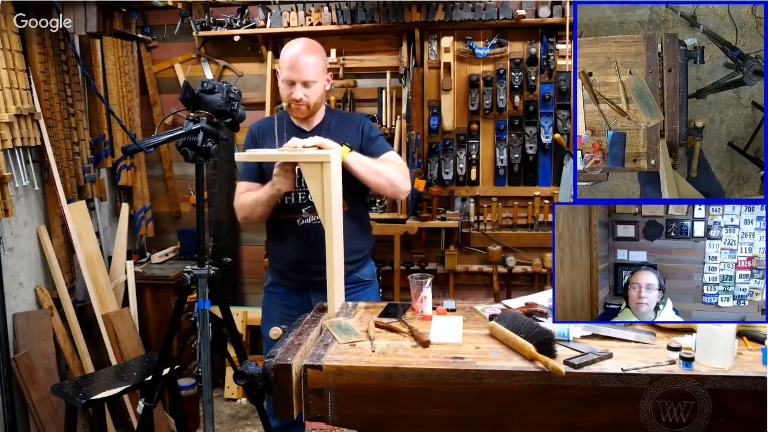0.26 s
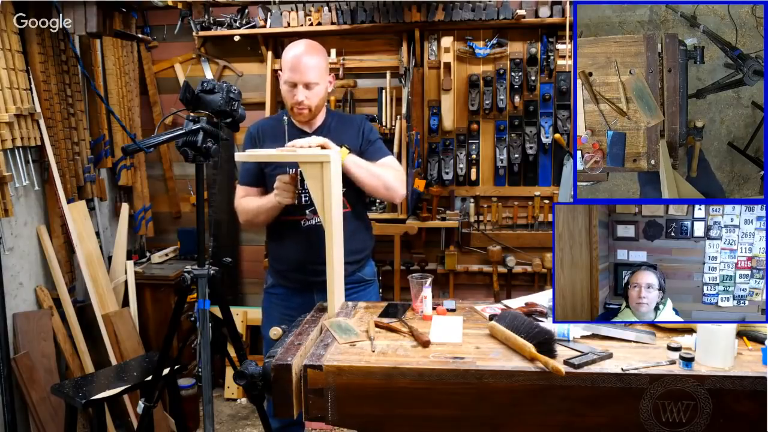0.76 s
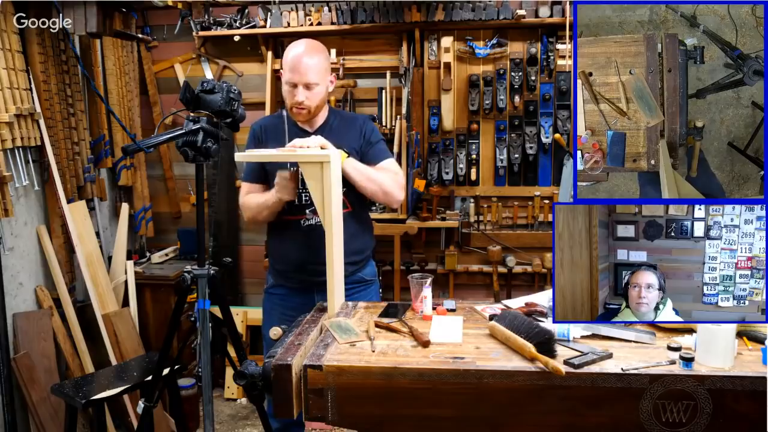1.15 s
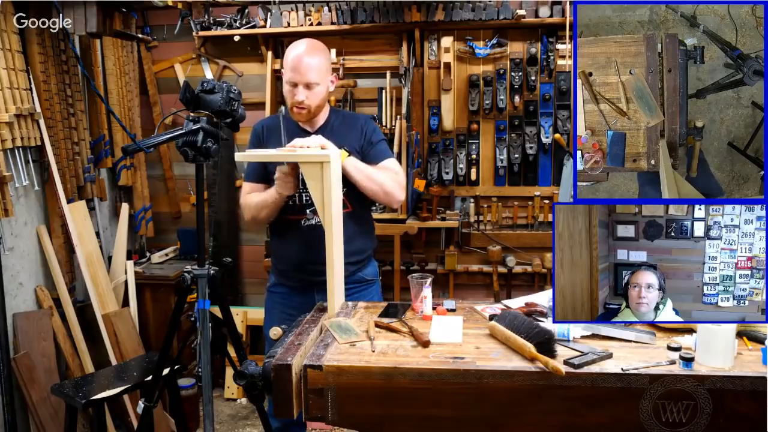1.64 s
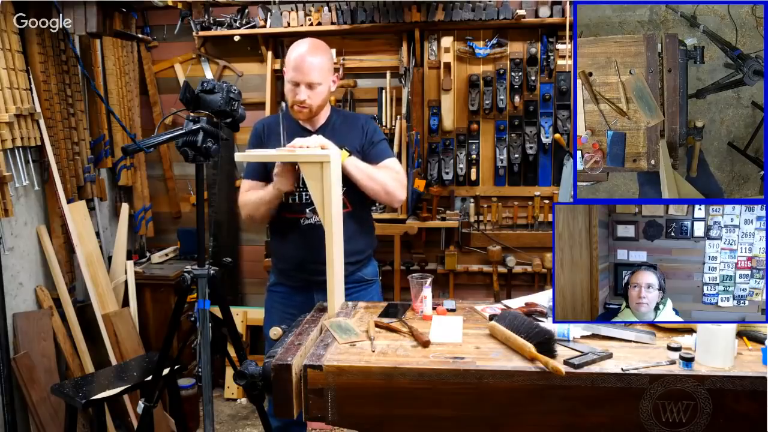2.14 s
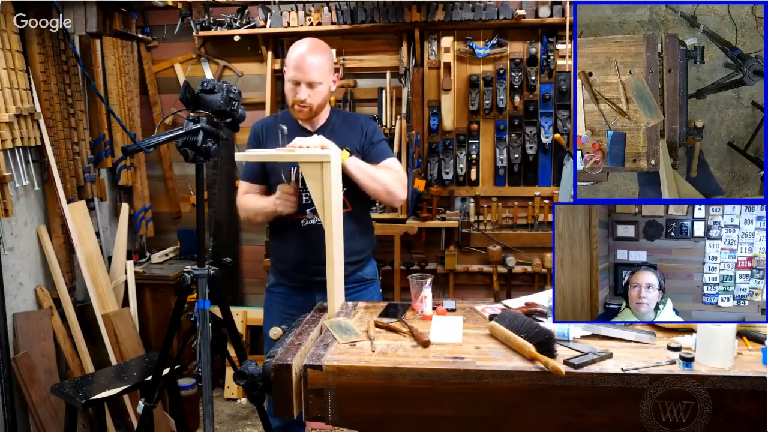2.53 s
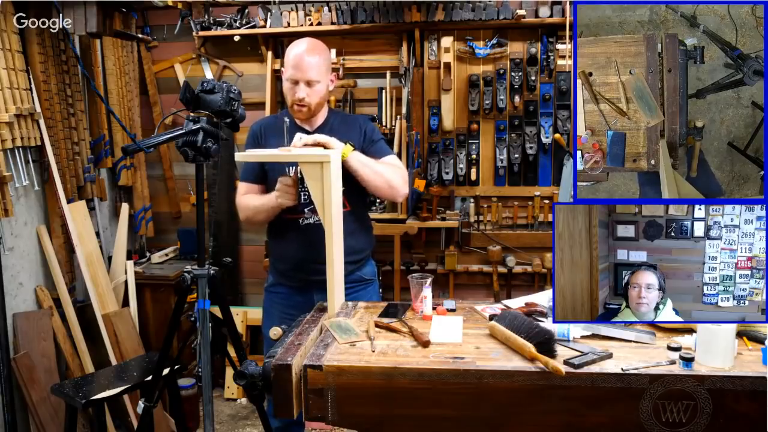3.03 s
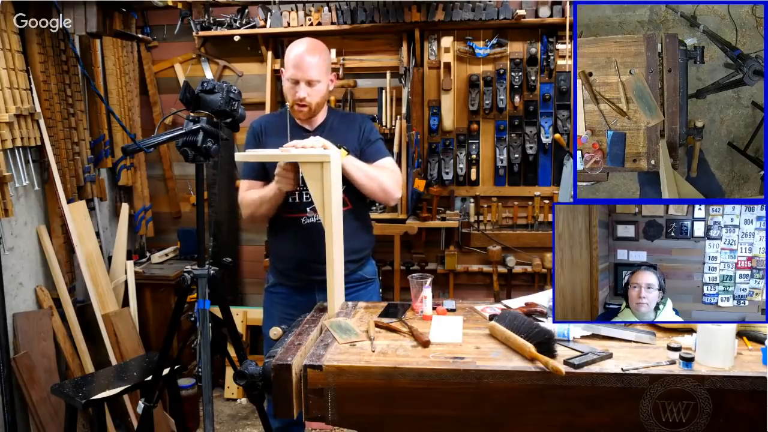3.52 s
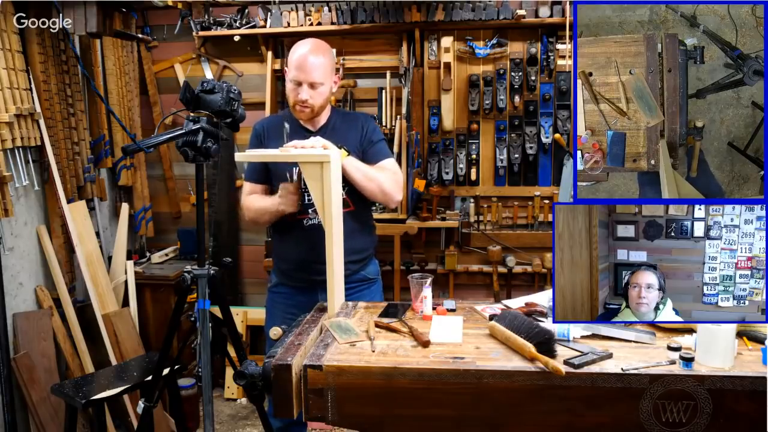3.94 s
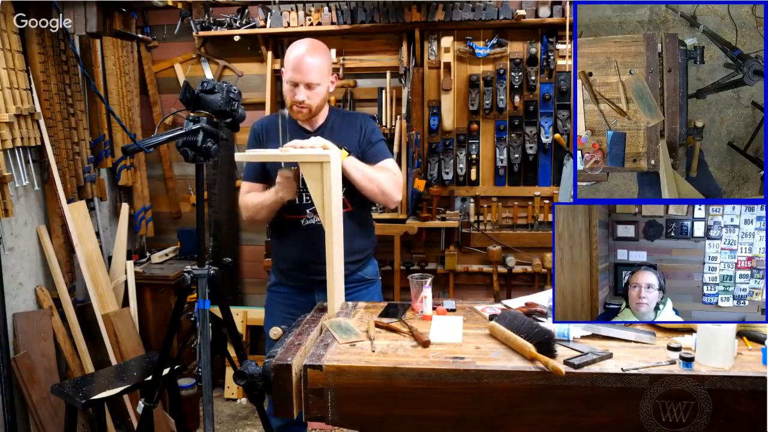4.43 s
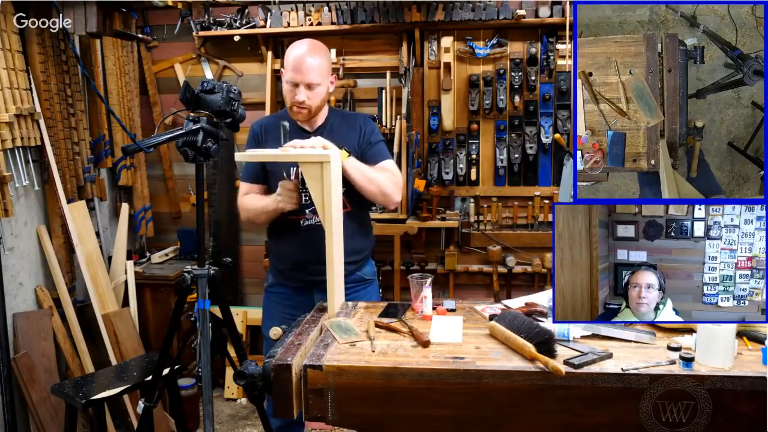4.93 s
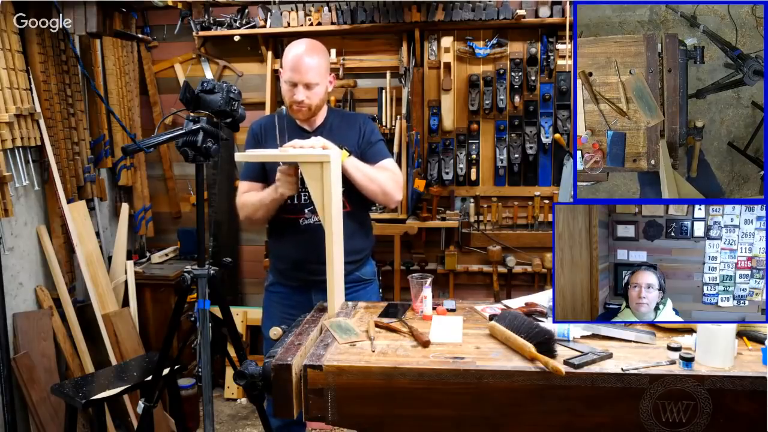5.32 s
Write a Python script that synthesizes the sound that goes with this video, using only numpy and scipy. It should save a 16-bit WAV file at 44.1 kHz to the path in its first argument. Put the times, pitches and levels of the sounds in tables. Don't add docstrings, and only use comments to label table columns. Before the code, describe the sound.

A fine-toothed hand saw works a thin clamped board, heard close in a small, cluttered workshop. Light fumbling scrapes and a hard knock come first, then brisk strokes grow louder, rough tearing alternating with an even whirr. A second hard knock ends the run around two and a half seconds; after faint touches and a near-silent gap, fast steady sawing resumes to the end.

```python
import sys
import numpy as np
from scipy import signal
from scipy.fft import rfft, irfft
from scipy.io import wavfile
from scipy.ndimage import uniform_filter1d

SR = 44100
rng = np.random.default_rng(int(sys.argv[2]) if len(sys.argv) > 2 else 0)


def master(y):
    cut = np.clip(np.atleast_2d(y).T, -1, 1)
    pcm = np.round(cut * 32767)
    wavfile.write(sys.argv[1], SR, pcm.astype(np.int16))


def volts_from_decibels(level):
    exponent = np.asarray(level, float) / 20
    return 10 ** exponent


N = 245681

# (f/Hz, width/Hz, level/dB)
STAND_MODES = [(72.4, 61, -36), (113, 33, -26.5), (171, 14, -17), (279, 47, -19), (338.6, 29, -13.5),
               (419, 27.6, -6)]
BOARD_MODES = [(550, 169, -25), (513.6, 21, -13.5), (594.7, 66, -4), (649.7, 44.7, 0.5), (721, 53.8, -0.5),
               (797, 54, -5)]
UPPER_MODES = [(1216, 57, -7.5), (1318, 51.1, -4), (1451.4, 77.6, 1), (1567, 72.5, 1), (1674, 72.5, -4),
               (1923, 115.3, -8.5), (2150, 152, -15.5), (2420, 206, -17.5), (2860, 522, -25),
               (3223, 820, -35.5)]
# (teeth engage t/s, hold/s, board level/dB, brightness/dB, stand rumble/dB)
CUTS = [(0.819, 0.087, -33.5, 9, 6), (1.116, 0.061, -29.5, 8, 6), (1.41, 0.052, -27, 7, -4),
        (1.676, 0.052, -22, 5.5, 1.5), (1.917, 0.051, -19, 3.5, -6.5), (2.163, 0.049, -19, 3.5, 1),
        (2.402, 0.047, -16, -1.5, -7), (3.08, .07, -38.5, -5, 4.5), (3.353, .05, -24, 3.5, 8),
        (3.597, 0.063, -22, 2.5, 8.5), (3.856, 0.049, -19.5, 5, 6.5), (4.097, 0.046, -18, 1.5, 10),
        (4.342, .05, -21.5, 5.5, 6), (4.588, .055, -21, 5, 0), (4.82, .045, -17.5, 2, 3.5),
        (5.060, .055, -26.5, 10, 5.5), (5.299, 0.051, -20.5, 2.5, -1), (5.54, 0.0085, -20.5, 3.5, 5.5)]
# (top speed t/s, board rings on/s, board level/dB, brightness/dB, tooth rate f/Hz)
RETURNS = [(1.0, 0.021, -28.5, -0.5, 738), (1.264, .045, -25.5, -4, 800), (1.576, 0.034, -19.5, -2.5, 740),
           (1.825, 0.031, -25.5, 5.5, 829), (2.066, 0.035, -16, -4, 824), (2.297, 0.046, -20.5, -4.5, 738),
           (2.553, 0.026, -25, 2.5, 668), (3.52, 0.011, -26.5, 0, 740), (3.751, 0.038, -32, 6.5, 760),
           (3.998, 0.037, -30, 5.5, 720), (4.238, 0.0355, -25.5, -0.5, 702), (4.49, .04, -19, -4, 730),
           (4.724, .03, -20, -1, 700), (4.955, 0.037, -25, 4.5, 628), (5.199, .045, -18.5, -5, 740),
           (5.435, .03, -18.5, -2, 716)]
FUMBLES = [(0.0, 0.083, -34.5, -11.5, 681.6), (0.063, 0.048, -29.5, -3.5, 700.5),
           (0.131, 0.0098, -31.5, -4, 608), (0.564, 0.014, -60, -20, 599.5), (0.613, 0.041, -35, -9.5, 651),
           (.68, 0.01753, -26, -14, 505.3), (2.601, 0.0135, -53, 15.5, 689.1),
           (2.684, 0.033, -33, -7.5, 693.6), (2.849, 0.1196, -94, 11, 699.6), (3.22, .01, -77, -9, 396.1)]
RETURN_HALF_S = .064


def level(x, db):
    return x * volts_from_decibels(db) / np.sqrt(np.mean(x ** 2))


def ring(x, modes):
    total = 0
    for k, (hz, width, db) in enumerate(modes):
        resonance = signal.lfilter(*signal.iirpeak(hz, hz / width, SR), x)
        total = total + (-1) ** k * volts_from_decibels(db) * resonance
    return total


def coloured(x, spectrum):
    hz, db = np.transpose(spectrum)
    bins = np.log(np.arange(N // 2 + 1) * SR / N + 1)
    return irfft(rfft(x) * volts_from_decibels(np.interp(bins, np.log(hz), db, left=-90, right=-90)), N)


def walk(rate):
    k = int(SR / rate)
    steps = np.repeat(rng.standard_normal(N // k + 1), k)
    return 1.1 * uniform_filter1d(steps, k)[:N]


def strokes():
    cut_hz, cut_even, cut_half_s = 742, .35, .073
    top_share = .62
    even_at_20_db, even_per_db = .77, .009
    fumble_even, fumble_half_s, rumble_db_per_hz = .3, .075, 0.05
    rows = []
    for s, hold, _, _, rumble_db in CUTS:
        rows.append((s + top_share * hold, cut_hz, cut_even, cut_half_s, rumble_db))
    for s, _, db, _, hz in RETURNS:
        rows.append((s, hz, even_at_20_db + even_per_db * (db + 20), RETURN_HALF_S, -4.5))
    for s, _, _, _, hz in FUMBLES:
        rumble_db = -0.5 + rumble_db_per_hz * (cut_hz - hz)
        rows.append((s, hz, fumble_even, fumble_half_s, rumble_db))
    return sorted(rows)


def blade(slowest=.3):
    brake_rumble_db = 8
    t = np.arange(N) / SR
    s, top_hz, even, half_s, rumble_db = np.transpose(strokes())
    nearest = np.searchsorted((s[1:] + s[:-1]) / 2, t)
    top_hz, even, rumble_db = top_hz[nearest], even[nearest], rumble_db[nearest]
    way = (t + .007 - s[nearest]) / half_s[nearest]
    way = np.where(way < 0, way / 1.3, way)
    swing = np.cos(np.pi / 2 * np.clip(way, -1, 1))
    hz = top_hz * np.maximum(swing, slowest)
    rumble_db = rumble_db + brake_rumble_db * even * np.clip(way, 0, 1)
    even = np.clip(even * (1 + .45 * np.clip(way, -1, 0)), 0, .97)
    return hz, even, rumble_db


def teeth(hz, even, wobble=.06, scatter_db=-0.5, push_s=0.0002):
    phase = np.cumsum(hz * (1 + wobble * (1.3 - even) * walk(400))) / SR
    tooth = phase.astype(int)
    size = volts_from_decibels(scatter_db * (2 - even) * rng.standard_normal(N // 20)[tooth])
    push = np.exp(-(phase % 1) / (push_s * hz))
    pushes = level(size * (push - uniform_filter1d(push, size=200)), 0)
    gate = size * np.exp(-(phase % 1) / .5)
    return pushes, gate


def pressure():
    # (full after t/s, stays past the hold/s, rise/dB/s, fall/dB/s, level/dB)
    cut_shape = [(0.0046, -0.0059, 1101, 450.5, 0.5), (0.001015, -0.0044, 1402.5, 483, 0),
                 (0.0081, -0.00049, 1507, 602, -17.5)]
    return_shape = [(0.018, -0.0055, 220, 482, -1), (0.0083, -0.012, 380, 734, 0),
                    (-0.0062, -0.012, 560, 650, -21.5)]
    fumble_shape = [(0.0, -0.04, 850, 470, 2), (0.0, -0.043, 850, 462, 7), (0.0, -0.021, 850, 512, -17)]
    # board, upper, dust [dB]
    drag_db = [9.5, 18.5, 24.5]
    # board, upper, dust [dB]
    scrape_db = [18.5, 16.5, 27]
    drag_db_per_s, return_lead = 79, 0.29
    scrape_db_per_s, scrape_s = 89, 0.075
    sag_db_per_s, sag_growth = 3, 5.05
    judder_s, judder_wide_s, judder_db, judder_db_per_s = 0.029, 0.0046, -1, -1.85
    t = np.arange(0, N / SR, .001)
    gains = np.zeros((3, len(t)))
    for rows, shape in ((CUTS, cut_shape), (RETURNS, return_shape), (FUMBLES, fumble_shape)):
        s, hold, db, bright_db, _ = np.transpose(rows)[:, :, None]
        lead = return_lead * hold if rows is RETURNS else 0
        for k, (full, past, rise, fall, shift_db) in enumerate(shape):
            early = np.maximum(s + full - lead - t, 0)
            late = np.maximum(t - s - hold - past, 0)
            up, down = rise * early, fall * late
            if rows is RETURNS:
                before_drag = np.maximum(early - 2 * RETURN_HALF_S, 0)
                up = np.minimum(up, drag_db[k] + drag_db_per_s * early + rise * before_drag)
            if rows is CUTS:
                after_scrape = np.maximum(late - scrape_s, 0)
                down = np.minimum(down, scrape_db[k] + scrape_db_per_s * late + fall * after_scrape)
                down = down + (sag_db_per_s + sag_growth * s) * np.clip(t - s, 0, hold)
            gains[k] += volts_from_decibels(db + (k > 0) * bright_db + shift_db - up - down).sum(axis=0)
    engage = np.array(CUTS)[:, :1]
    bows = np.exp(-((t - engage - judder_s) / judder_wide_s) ** 2).sum(axis=0)
    gains *= volts_from_decibels(bows * (judder_db + judder_db_per_s * t))
    board, upper, dust = (np.interp(np.arange(N) / SR, t, g) for g in gains)
    return board, upper, dust * volts_from_decibels(grain(column=1))


def grain(column):
    # (t/s, chips/dB, chip tilt/dB per steel zone, highest board modes/dB, whine of free blade length f/Hz)
    met = [(0, 2, -4, -1.5, 5600), (.65, 1, -0.5, 0.5, 5100), (1.2, 3, 2.5, 3.5, 5493),
           (1.8, 0.5, 0, 1.5, 6250), (2.3, -3, -4.5, -0.5, 6773), (2.6, -1, -1, 1.5, 6935),
           (3.2, -1.5, 1.5, -0.5, 7000), (4.2, -2.5, 0, 0.5, 6520), (4.8, -5.5, -0.5, 0, 6030),
           (5.57, -4, -2.5, 0.5, 6500)]
    return np.interp(np.arange(N) / SR, *np.transpose(met)[[0, column]])


def bites(fade_s=0.0064, below_db=-19.5):
    # (t/s, peak level/dB)
    hard_spots = [(0.815, -61), (0.851, -17.5), (1.114, -21), (1.404, -28.5), (1.675, -10.5), (1.725, 0.5),
                  (1.914, 2.5), (1.966, 4.5), (2.07, -15.5), (2.148, -7.5), (2.189, -13.5), (2.402, 5),
                  (2.45, 6), (2.508, 1.5), (3.349, -16.5), (3.389, -1), (3.596, -12.5), (3.854, -10),
                  (4.101, -6), (4.139, -11), (4.34, -10.5), (4.381, -10.5), (4.483, 4), (4.59, 2.5),
                  (4.823, -0.5), (4.861, 1), (5.06, 1.5), (5.193, 2.5), (5.301, 4), (5.545, -22)]
    start = np.zeros(N)
    for s, db in hard_spots:
        start[int(s * SR)] = volts_from_decibels(db + below_db)
    fading = signal.lfilter([1], [1, -np.exp(-1 / (fade_s * SR))], start)
    return uniform_filter1d(fading, size=300)


def whine(width_hz=450, db=-9):
    slow = signal.lfilter(*signal.butter(2, width_hz, fs=SR), rng.standard_normal((2, N)))
    turn = 2 * np.pi * np.cumsum(grain(column=4)) / SR
    return level(slow[0] * np.cos(turn) + slow[1] * np.sin(turn), db) * volts_from_decibels(3.1 * walk(12))


def chips(gate):
    # (f/Hz, level/dB per Hz)
    dust_colour = [(2120, -33), (3600, -7.5), (5770, -1), (6450, -10), (7700, -9.5), (8390, -3),
                   (10200, -5.5), (12500, -9), (14100, -15.5), (15600, -29)]
    # (f/Hz, width/Hz, level/dB)
    zones = [(5250, 550, 1.5), (6644, 1390, 7), (8200, 3100, -1), (12800, 3400, 2)]
    grit = (1.6 + gate) * rng.standard_normal(N)
    steel = np.zeros(N)
    for k, zone in enumerate(zones):
        drift_db = 3.5 * walk(10) + (k - 1.5) * grain(column=2)
        steel += volts_from_decibels(drift_db) * ring(ring(grit, [zone]), [zone])
    return level(coloured(grit, dust_colour), -3) + level(steel, -6) + whine()


def wood(force, sharp, rumble_db, tear):
    # (f/Hz, width/Hz, level/dB)
    edge_modes = [(944, 66.4, -6), (1059.5, 124, -14.5)]
    shallow = np.exp(-((np.arange(N) / SR - 1.2) / .5) ** 2)
    edge = ring(force * volts_from_decibels(8.4 * shallow), edge_modes)
    low = ring(force * volts_from_decibels(rumble_db), STAND_MODES) + ring(force, BOARD_MODES) + edge
    high = ring(np.diff(sharp, prepend=0), UPPER_MODES[:5])
    highest = ring(np.diff(sharp * volts_from_decibels(grain(column=3)), prepend=0), UPPER_MODES[5:])
    low = low / np.std(ring(tear, BOARD_MODES))
    return low + (high - highest) / np.std(ring(np.diff(tear), UPPER_MODES))


def saw():
    board, upper, dust = pressure()
    hz, even, rumble_db = blade()
    pushes, gate = teeth(hz, even)
    catch = volts_from_decibels(2.96 * (1 - even) * walk(70))
    bite = bites()
    tear = level((0.5 + gate) * rng.standard_normal(N), 0)
    dull_drive = 0.16 * np.sqrt(even) * pushes + 0.92 * (1 - even) * tear
    sharp_drive = 0.4 * np.sqrt(even) * pushes + 0.86 * (1 - 0.5 * even) * tear
    force = (catch * board + bite) * dull_drive
    sharp = (catch * upper + 1.001 * bite) * sharp_drive
    dust_gain = dust * volts_from_decibels(2.7 * walk(90)) + 0.032 * bite
    return wood(force, sharp, rumble_db, tear) + chips(gate) * dust_gain


def shop_air():
    # (f/Hz, level/dB per Hz)
    air_colour = [(18, -32), (30, -0.5), (443, -10.5), (673, -5.5), (747, -17), (1050, -18), (1470, -16),
                  (1910, -24), (15500, -31.5)]
    return level(coloured(rng.standard_normal(N), air_colour), -73.5) * volts_from_decibels(2.2 * walk(36))


def knocks(contact_s=0.00022):
    # (t/s, peak level/dB)
    hits = [
        (0.263, -46.5),
        (0.675, -8.5),
        (2.508, -7.5),
        (2.682, -44),
        (2.911, -49.5),
    ]
    blows = np.zeros(N)
    for s, db in hits:
        blows[int(s * SR)] = volts_from_decibels(db)
    blows = np.convolve(blows, np.hanning(int(contact_s * SR) + 3))[:N]
    stand = volts_from_decibels(14) * ring(blows, STAND_MODES)
    return volts_from_decibels(15.5) * (stand + ring(blows, BOARD_MODES) + volts_from_decibels(-4.5) * ring(blows, UPPER_MODES))


def squeak():
    # (t/s, f/Hz, level/dB)
    creak = (.365, 4700, -75)
    s, hz, db = creak
    t = np.arange(N) / SR - s
    return volts_from_decibels(db) * np.exp(-(t / 0.015) ** 2) * np.sin(2 * np.pi * hz * t)


def scene():
    dry = saw() + knocks() + squeak()
    t = np.arange(SR // 4) / SR
    decay = volts_from_decibels(-60 * t / 0.12)
    tail = level(rng.standard_normal(len(t)) * decay, 0) / np.sqrt(len(t))
    room = signal.fftconvolve(dry, tail)[:N]
    return (dry + volts_from_decibels(-10.5) * room + shop_air())[None]


def band_limit(x):
    return signal.sosfilt(signal.butter(12, 15750, fs=SR, output="sos"), x)


def record(dry):
    mix = np.tanh(0.78 * dry) / 0.86
    return band_limit(mix)


dry = scene()
out = record(dry)
master(out)
```